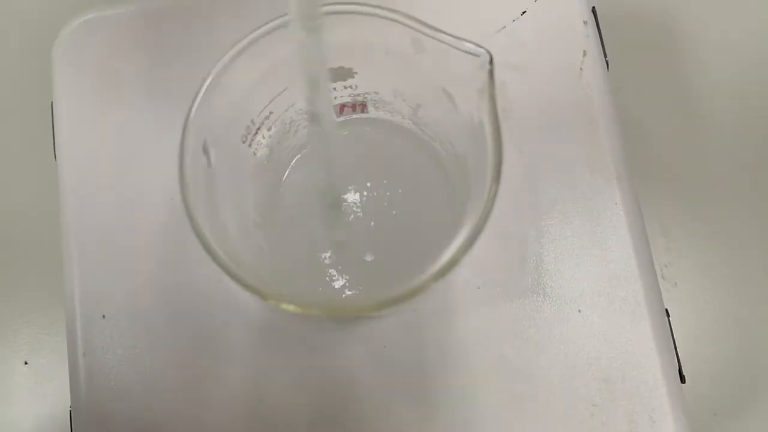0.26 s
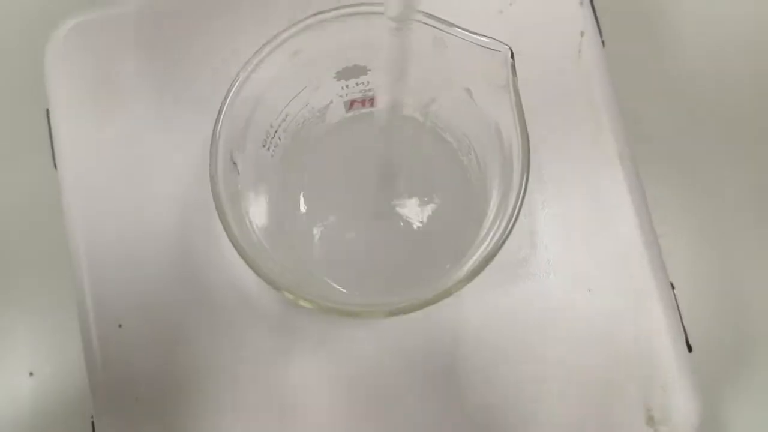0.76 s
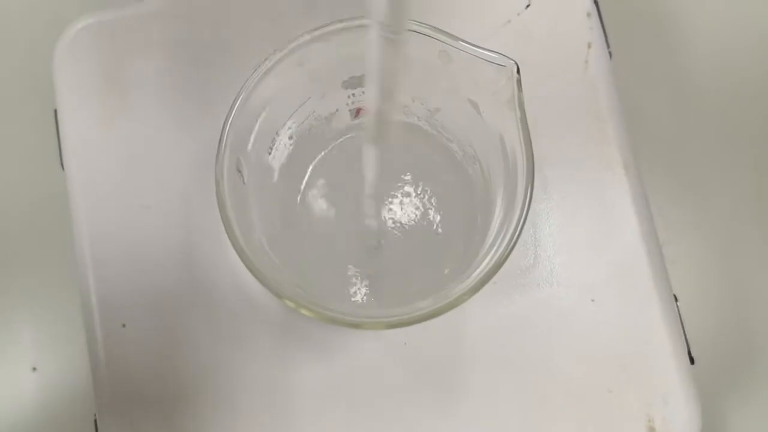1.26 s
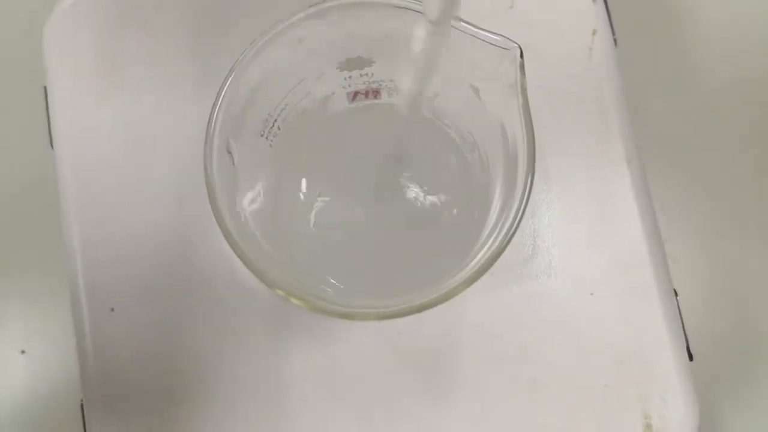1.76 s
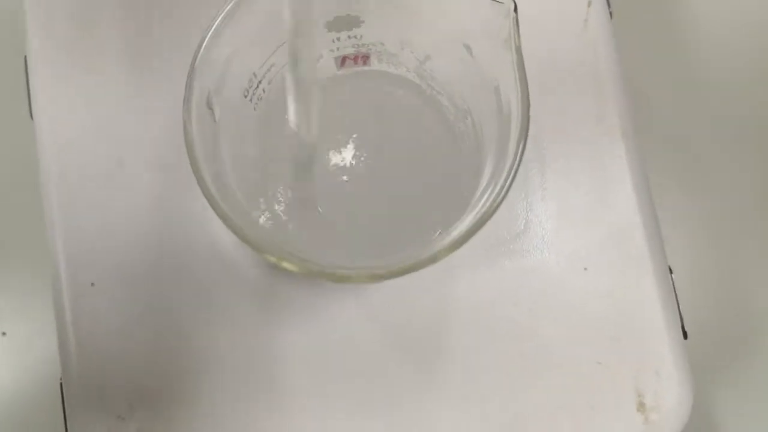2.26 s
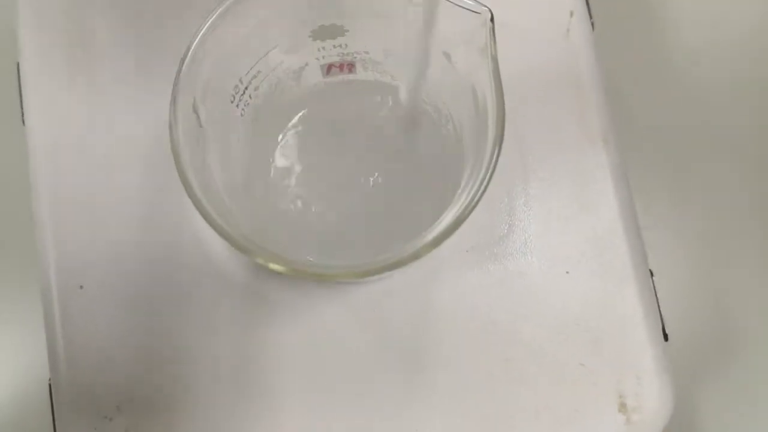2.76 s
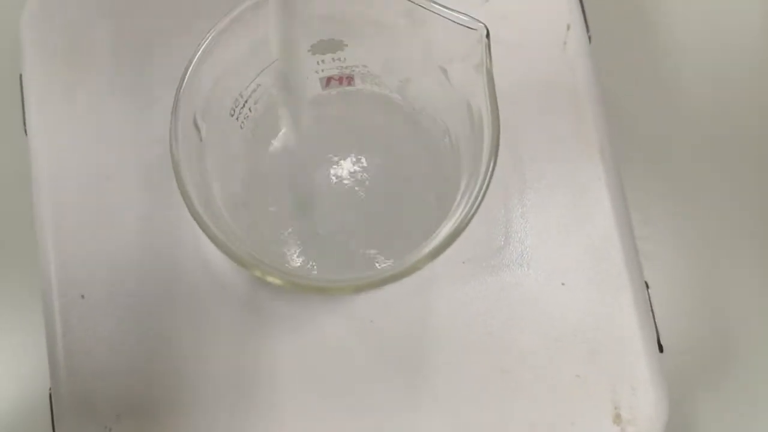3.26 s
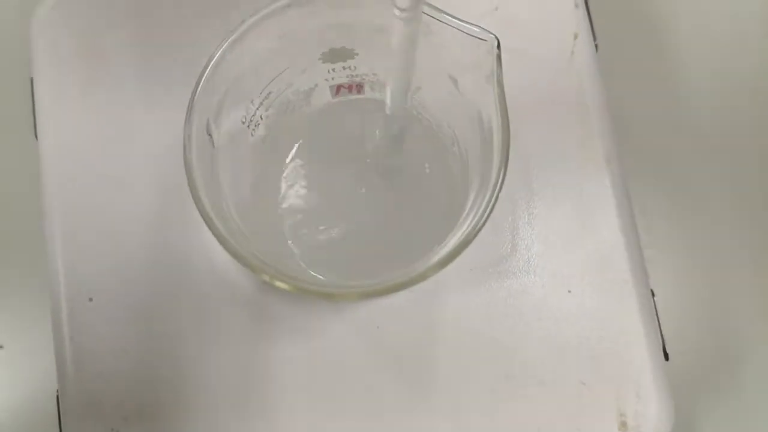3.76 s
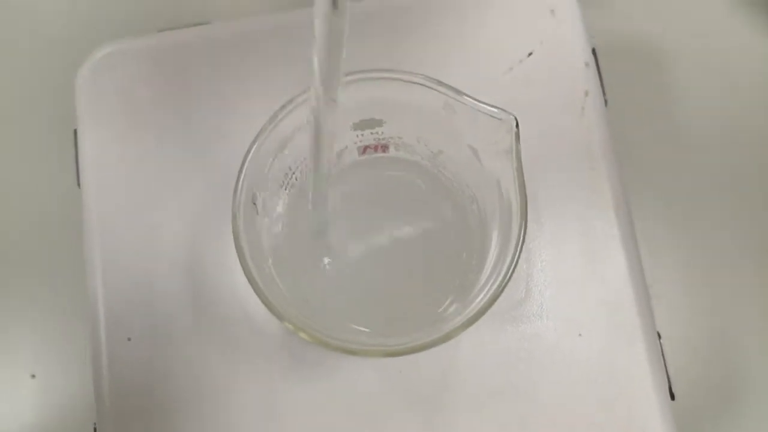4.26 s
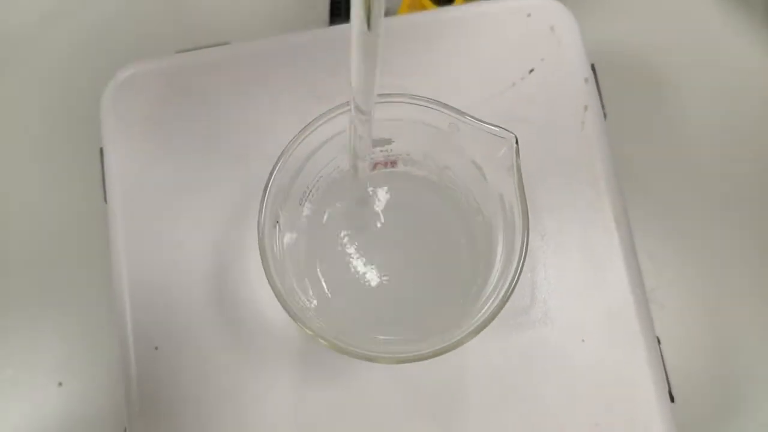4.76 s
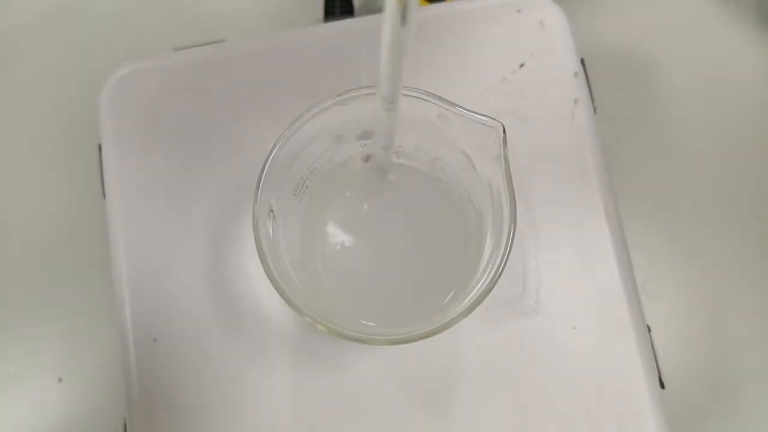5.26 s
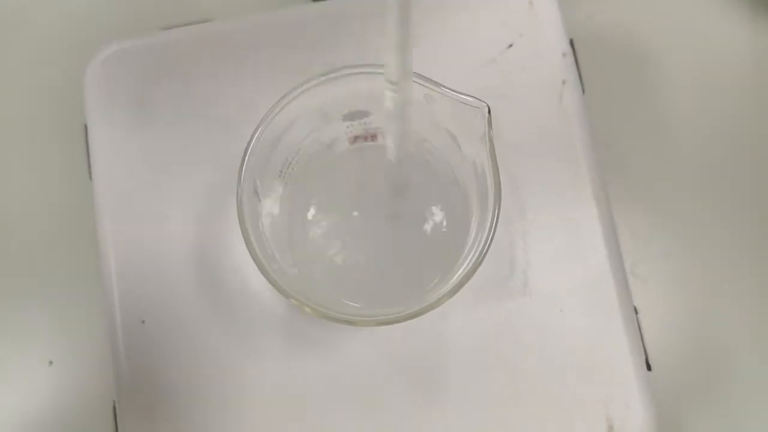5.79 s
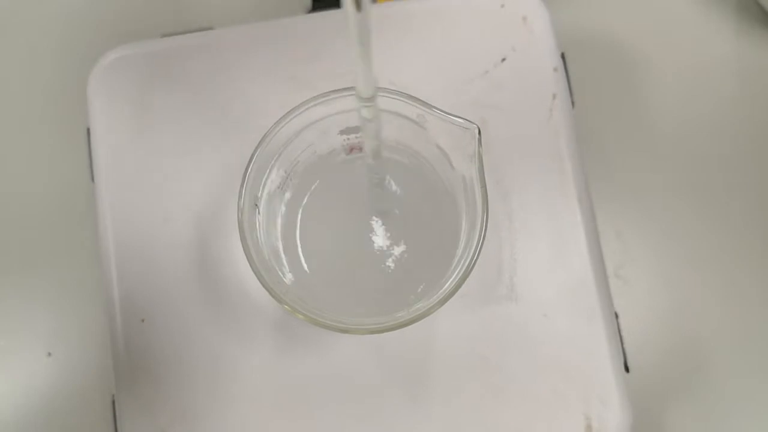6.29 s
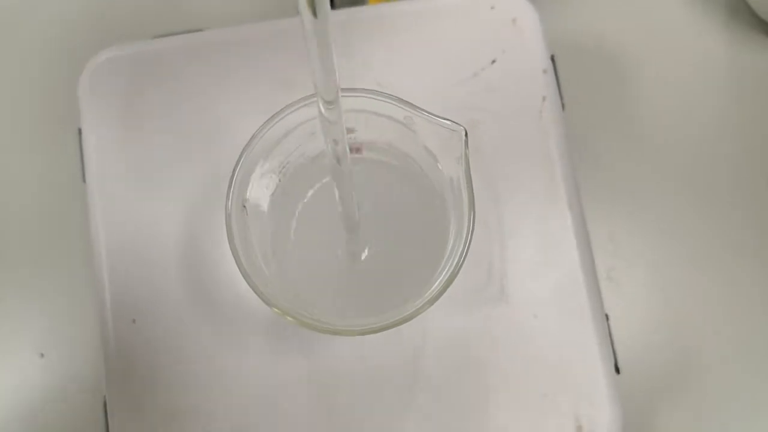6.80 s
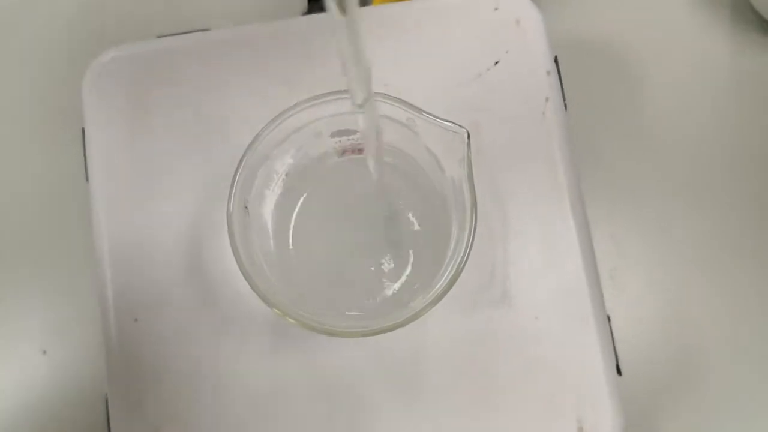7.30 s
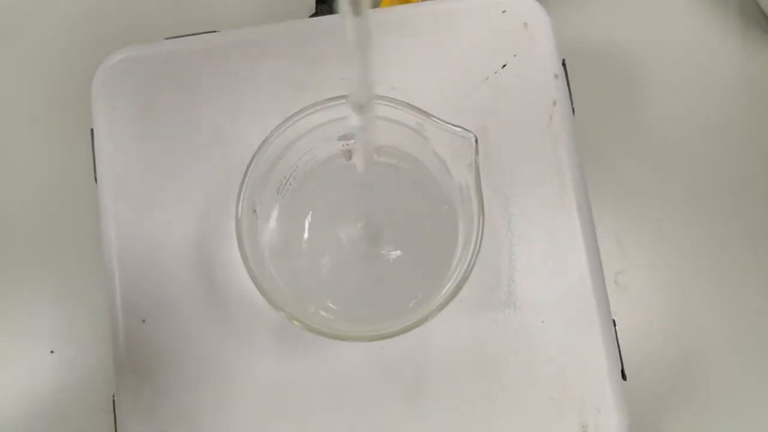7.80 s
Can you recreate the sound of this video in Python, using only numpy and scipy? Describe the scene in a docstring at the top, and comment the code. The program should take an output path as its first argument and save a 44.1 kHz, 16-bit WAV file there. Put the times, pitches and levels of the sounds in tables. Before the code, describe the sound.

Over a low hum and ventilation, a stirring rod now and then clinks and scrapes against a glass beaker.

```python
"""Stirring in a glass beaker

A glass rod stirs liquid in a beaker on a laboratory hotplate. Every few turns it clinks on the wall
and bounces; in between it grazes the glass, or sticks and slips over it with a rasp.
The liquid swishes softly and traps a few bubbles.
A machine hums steadily, and ventilation rushes and rumbles in the small, hard room."""
import sys
import numpy as np
from scipy import signal
from scipy.fft import rfft, irfft, next_fast_len
from scipy.io import wavfile
from scipy.ndimage import map_coordinates

SR = 44100
rng = np.random.default_rng(int(sys.argv[2]) if len(sys.argv) > 2 else 0)


def wav_record(signal):
    """Record a signal, one row per channel, as 16-bit PCM in the file named by sys.argv[1]."""
    frames = np.transpose(np.atleast_2d(signal))
    bounded = np.clip(frames, -1, 1)
    # unit amplitude maps onto the largest positive 16-bit level
    quanta = np.round(bounded * 32767).astype(np.int16)
    wavfile.write(sys.argv[1], SR, quanta)


N = 354563

# the tone colour of glass hitting glass: f/Hz, level/dB
CRACK_COLOUR = [(250, -19.5), (800, -11), (1300, 0.5), (5000, -2.5), (8000, 1), (11000, -18),
                (14500, -19.5), (16000, -29)]
# how the beaker's sound divides between the two sides: f/Hz, left minus right/dB
BALANCE = [(430, 0), (1200, 0), (1550, -8), (2500, -9), (2900, -1), (3300, 7), (4000, 8), (4600, -2),
           (5300, 6), (7800, 5), (8400, 0), (9700, -11), (11600, -9), (13300, -1)]


def amp(db):
    """Turn decibels into a gain."""
    return 10 ** (np.asarray(db) / 20)


def unit(x):
    """Scale a signal to an average power of 1."""
    return x / np.sqrt(np.mean(x ** 2) + 1e-20)


def along(points, hz):
    """Read a curve of (frequency, value) points on a logarithmic frequency axis."""
    f, v = np.transpose(points)
    return np.interp(np.log(hz + 1), np.log(f + 1), v)


def wobble(rate):
    """A smooth curve through `rate` random values a second."""
    return map_coordinates(rng.standard_normal(int(N * rate / SR) + 4), [np.arange(N) * rate / SR])


def filtered(x, response):
    """Multiply each frequency in x by response(hz)."""
    size = next_fast_len(x.shape[-1] + SR // 4)
    return irfft(rfft(x, size) * response(np.fft.rfftfreq(size, 1 / SR)), size)[..., :x.shape[-1]]


def add(track, s, sound):
    """Mix a stereo sound into the track, starting at s seconds."""
    part = track[:, max(round(s * SR), 0):][:, :sound.shape[1]]
    part += sound[:, :part.shape[1]]


def hum(waver_db=-0.2, drift_rad=.03, lead_rad=0.21):
    """Mains hum and motor tones waver slightly and arrive a little earlier on the left."""
    # the machine's tones: f/Hz, level/dB
    tones = [(100, -62.5), (195, -52.5), (200.05, -33.5), (224, -52), (400.1, -85.5)]
    track, t = np.zeros((2, N)), np.arange(N) / SR
    lead = np.array([[lead_rad], [-lead_rad]]) / 2
    for hz, db in tones:
        gain = np.sqrt(2) * amp(db + waver_db * wobble(2.7))
        phase = 2 * np.pi * (hz * t + rng.random()) + drift_rad * wobble(28)
        track += gain * np.sin(phase + lead)
    return track


def rumble(level_db=-41.5, apart_db=-21):
    """Long sound waves from the air ducts reach both sides almost alike."""
    # the building's rumble: f/Hz, relative level/dB
    colour = [(12, -32.5), (19, -7), (26, -8), (36, 4.5), (44, -9.5), (54, 5.5), (68, 3), (78, -21.5),
              (88, -13.5), (100, -5), (112, -10), (124, -1), (165, -1), (240, -8.5), (320, -16.5),
              (600, -35), (2000, -120)]
    waves = rng.standard_normal(N) + amp(apart_db) * rng.standard_normal((2, N))
    return amp(level_db) * unit(filtered(waves, lambda hz: amp(along(colour, hz))))


def ventilation(level_db=-52, lead_s=0.00045):
    """An even rush of air: part comes straight from the left, the rest from all around."""
    # the air's tone colour: f/Hz, left level/dB, right level/dB
    colour = [(161, -25.5, -35), (381, 0.5, -1), (530, -3, -1), (820, 0, -4.5), (870, 3.5, 2),
              (1060, 2, -9.5), (1152, -1.5, 6.5), (1360, -5, -1.5), (1800, -3, 3), (2070, -3.5, -1.5),
              (2596, -5.5, -1.5), (3400, -10.5, -12), (4630, -16, -19.5), (5840, -14.5, -17),
              (6500, -22, -28), (7550, -11, -17.5), (8750, -25.5, -33.5), (9200, -30, -21.5),
              (11400, -34.5, -33), (15500, -33, -34.5)]
    # how alike the two sides are: f/Hz, share of the power that comes straight
    share = [(300, 0.33), (900, 0.057), (2000, 0.19), (4000, 0.1)]
    lead = np.array([[lead_s], [-lead_s]]) / 2
    direct = filtered(rng.standard_normal(N),
                      lambda hz: np.sqrt(along(share, hz)) * np.exp(2j * np.pi * hz * lead))
    around = filtered(rng.standard_normal((2, N)), lambda hz: np.sqrt(1 - along(share, hz)))
    left = [(hz, db) for hz, db, _ in colour]
    right = [(hz, db) for hz, _, db in colour]
    air = filtered(direct + around, lambda hz: amp([along(left, hz), along(right, hz)]))
    return amp(level_db) * unit(air)


def ring(modes, phase_spread, lag_s, slosh, attack_s):
    """Glass rings at its own tones (modes); each fades by 60 dB in its ring time, t60."""
    t = np.arange(SR // 2) / SR
    hz, db, t60 = np.transpose(modes)[:, :, None]
    strength, skew, swirl = rng.standard_normal((3, len(hz), 1))
    sides = np.array([1, -1])[:, None, None] / 2
    envelope = amp(db + 2 * strength - 60 * t / t60) * (1 - np.exp(-(t / attack_s) ** 2))
    # liquid rising and falling along the wall bends the pitch of each tone
    pitch = hz * (1 + slosh * np.sin(2 * np.pi * (7 * t + swirl)))
    side_shift = sides * (phase_spread * skew - 2 * np.pi * hz * lag_s)
    phase = 2 * np.pi * np.cumsum(pitch, axis=1) / SR + side_shift
    return np.sum(amp(sides * along(BALANCE, hz)) * envelope * np.sin(phase), axis=1)


def crack(t60, rise_s, dull_db, balance_share=0.33):
    """Countless high, fast-fading tones of the glass merge into one short burst."""
    t = np.arange(SR // 16) / SR
    noise = rng.standard_normal(len(t)) + rng.standard_normal((2, len(t)))
    burst = noise * amp(-60 * t / t60) * (1 - np.exp(-t / rise_s))
    sides = balance_share * np.array([[1], [-1]]) / 2
    dulling = [(8000, 0), (14000, dull_db)]
    return filtered(
        burst, lambda hz: amp(along(CRACK_COLOUR, hz) + along(dulling, hz) + sides * along(BALANCE, hz)))


def contact(treble_db, low_db, mid_db, ring_factor, ring_db=6, crack_db=7, chatter_db=-12):
    """One blow rings the glass; where the rod lands decides which tones are strongest."""
    # the tones of the struck beaker and rod: f/Hz, level/dB, ring time/s
    glass_modes = [(1088, -7, 0.034), (1617, -8.5, 0.15), (1664, 2.5, 0.09), (1760, -16, 0.43),
                   (2072, -3.5, 0.05), (2356, -7.5, 0.046), (4530, -9, 0.062), (4610, -2, 0.06),
                   (4610, -19, 0.31), (4750, -13.5, 0.15), (5530, -17, 0.0035), (6000, -23, 0.022),
                   (6390, -4.5, 0.026), (7240, -2, 0.013), (7800, -3.5, .01), (7985, -1.5, 0.013),
                   (9760, -3, 0.0094), (11000, -11, 0.0087), (11300, -11.5, 0.0064), (13300, -18, .01),
                   (14500, -23, .01)]
    colour = [(2400, low_db), (3900, mid_db), (4800, mid_db), (6000, treble_db)]
    modes = [(hz, db + along(colour, hz), t60 * ring_factor) for hz, db, t60 in glass_modes]
    glass = amp(ring_db) * ring(modes, phase_spread=0.57, lag_s=0, slosh=0.011, attack_s=0.00079)
    # a light touch skids along the wall, so its crack is softer, duller and longer
    light = np.clip((-36 - treble_db) / 15, 0, 1)
    burst = crack(t60=0.019 + 0.011 * light, rise_s=0.00055 + 0.0004 * light, dull_db=-8 * light)
    add(glass, 0, amp(treble_db + crack_db) * burst)
    # hard glass bounces and touches again within a few milliseconds
    add(glass, 0.0011 * (1 + rng.random()), amp(chatter_db) * glass)
    return glass


def clinks(scatter=.08, dull_db=-15.5, low_boost_db=2.5):
    """A hard, freely ringing blow, then a duller one as the rod lands again."""
    # the rod strikes the wall: t/s, treble/dB, low tones/dB, middle tones/dB, ring time factor, bounce/s
    blows = [(0.338, -16.5, -32, -38, 0.88, .011), (3.062, -28.5, -38.5, -39, 1.24, .014),
             (4.6007, -18.5, -28.5, -31.5, 0.96, .009), (6.2608, -28, -36, -29.5, 1.11, 0.0071),
             (7.646, -20.5, -34, -27, 1.12, 0.0084)]
    track = np.zeros((2, N))
    for s, treble_db, low_db, mid_db, ring_factor, bounce_s in blows:
        add(track, s, contact(treble_db, low_db, mid_db, ring_factor))
        landing = contact(treble_db + dull_db, low_db + low_boost_db, mid_db + dull_db, ring_factor=0.52)
        add(track, s + bounce_s * np.exp(scatter * rng.standard_normal()), landing)
    return track


def touches():
    """Light ticks, cut short because the rod stays on the glass."""
    # the rod grazes the wall: t/s, treble/dB, low tones/dB
    grazes = [(0.392, -47.5, -49), (0.4487, -46.5, -47), (1.669, -44, -41), (2.0656, -47.5, -50.5),
              (2.898, -43, -70), (3.483, -42.5, -55), (3.895, -36, -45), (4.8835, -46, -53),
              (5.4362, -50.5, -60), (5.933, -49.5, -47), (6.1375, -48, -60), (6.6, -40, -37),
              (7.728, -45.5, -47)]
    track = np.zeros((2, N))
    for s, treble_db, low_db in grazes:
        add(track, s, contact(treble_db, low_db, mid_db=treble_db - 23, ring_factor=0.43))
    return track


def skitter(count=60, base_db=-55.5, spread_db=6):
    """At random moments the rod's tip brushes faintly over the wet bottom."""
    track = np.zeros((2, N))
    for when, strength, length in rng.random((count, 3)):
        brush = crack(t60=0.016 + 0.11 * length ** 2, rise_s=0.0026, dull_db=-8.5)
        add(track, when * N / SR, amp(base_db + spread_db * strength) * brush)
    return track


def bubbles(t60=0.04, attack_s=0.00092, glide_per_s=1.5):
    """A trapped bubble rings briefly, its pitch rising as it nears the surface."""
    # small bubbles in the liquid: t/s, starting f/Hz, level/dB
    blips = [(0.552, 1593, -29.5), (4.237, 1570, -40.5), (6.006, 1600, -40), (6.914, 1550, -33.5),
             (7.988, 1126, -33)]
    track, t = np.zeros((2, N)), np.arange(SR // 12) / SR
    for s, hz, db in blips:
        envelope = amp(db - 60 * t / t60) * (1 - np.exp(-t / attack_s))
        blip = envelope * np.sin(2 * np.pi * hz * t * (1 + glide_per_s * t / 2))
        add(track, s, np.array([blip, blip]))
    return track


def swishes(level_db=-54):
    """The rod pushes a soft wave of liquid round the wall."""
    # waves along the wall: t/s, length/s
    waves = [(1.307, .14), (5.38, .1), (7.206, 0.14)]
    # the tone colour of moving liquid: f/Hz, relative level/dB
    colour = [(700, -31), (1750, 5), (2600, -13.5), (4200, -21), (5800, -14), (10000, -23), (14000, -40)]
    track = np.zeros((2, N))
    for s, length_s in waves:
        size = int(length_s * SR)
        wave = filtered(rng.standard_normal((2, size)), lambda hz: amp(along(colour, hz)))
        add(track, s, amp(level_db) * unit(wave) * np.hanning(size))
    return track


def drags(slip_hz=430, jitter=.25, spread_db=2.5, grit_db=-26, hiss_db=-25, after_db=-10, build_s=0.1):
    """The rod sticks and slips: fast, uneven little blows make the beaker rasp."""
    # drags over the glass: t/s of most pressure, rise/s, fall/s, level/dB, treble bite/dB
    strokes = [(1.47, 0.015, .02, -45, -2), (1.5185, 0.0034, 0.054, -16.5, -5.5),
               (3.657, .003, .008, -43, -12), (3.791, 0.032, .018, -23.5, -3.5),
               (6.726, 0.035, 0.038, -19.5, 0), (6.7676, .002, 0.0054, -20, -0.5),
               (6.793, 0.011, 0.0069, -19, -2.5), (6.817, 0.016, 0.0098, -27.5, -4),
               (7.991, 0.015, .022, -45.5, 1)]
    # the tones of the beaker and its plate under the pressing rod: f/Hz, level/dB, ring time/s
    pressed_modes = [(432.8, -28, 0.17), (410, -30, 0.15), (984, -20, 0.067), (1197, -10, 0.058),
                     (1367, -17, 0.032), (1580, 1.5, 0.022), (1740, -0.5, 0.02), (1993, -1.5, 0.023),
                     (2334, -14, 0.015), (2524, -2, 0.011), (2800, -18, 0.012), (3370, -4, 0.013),
                     (3570, -3, 0.0076), (4730, -16, 0.0054), (5330, -9, 0.0071), (5900, -13.5, 0.012),
                     (7500, -9.5, 0.0066), (8540, -19.5, 0.0063), (10000, -28.5, 0.007),
                     (10900, -24, 0.004)]
    # the wall rings on as the rod lets go: f/Hz, level/dB, ring time/s
    released_modes = [(1730, -1, 0.8), (1710, -3, 0.83)]
    track, size = np.zeros((2, N)), SR // 4
    t = (np.arange(size) - size // 2) / SR
    hiss_tilt = [(6000, 4.5), (14000, -17)]
    for s, rise_s, fall_s, db, bite_db in strokes:
        # the pressure swells and eases: a broad top, 15 dB lower at the ends of rise and fall
        pressure = amp(-15 * np.abs(t / np.where(t < 0, rise_s, fall_s)) ** 2.9)
        gap, strength = rng.standard_normal((2, 160))
        slips = np.cumsum(np.exp(jitter * gap)) * SR / slip_hz
        force = np.bincount(slips.astype(int), amp(spread_db * strength), minlength=size)[:size]
        force += amp(grit_db) * rng.standard_normal(size)
        # each drag has its own brightness: some rasps sound duller, others sharper
        bite = [(2400, 0.023), (3300, bite_db)]
        modes = [(hz, level + along(bite, hz), t60) for hz, level, t60 in pressed_modes]
        body = ring(modes, phase_spread=1.0, lag_s=.0001, slosh=0.0063, attack_s=0.00076)
        rasp = signal.fftconvolve((force * pressure)[None], body, axes=1)
        rasp *= np.sqrt(2 * np.sum(pressure ** 2) / np.sum(rasp ** 2))  # energy follows the pressure
        # the fine roughness of the glass hisses under the rod
        noise = rng.standard_normal((2, size))
        hiss = filtered(noise, lambda hz: amp(along(CRACK_COLOUR, hz) + along(hiss_tilt, hz)))
        add(rasp, 0, amp(hiss_db + bite_db) * pressure * unit(hiss))
        add(track, s + t[0], amp(db) * rasp)
        # the longer the rod eases off, the more ring it leaves in the wall
        after = ring(released_modes, phase_spread=0.85, lag_s=0, slosh=0.011, attack_s=0.0048)
        add(track, s + fall_s / 2, amp(db + after_db) * (fall_s / build_s) ** 2 * after)
    return track


def room(x, early_db, early_s, tail_db, echoes=14):
    """The bench and nearby things echo at once; the walls add a short, smooth tail."""
    # how long the room rings: f/Hz, time to fade by 60 dB/s
    ring_times = [(300, 0.22), (1700, 0.59), (5000, 0.42), (9000, 0.28), (15000, 0.15)]
    hz, t, noise = signal.stft(rng.standard_normal((2, SR // 2)), SR, nperseg=256)
    fade = amp(-60 * t / along(ring_times, hz)[:, None])
    tail = signal.istft(noise * fade, SR, nperseg=256)[1]
    response = amp(tail_db) * tail / np.linalg.norm(tail[0])
    for side in response:
        delays = (SR * rng.uniform(.003, early_s, echoes)).astype(int)
        side[delays] += amp(early_db) * rng.standard_normal(echoes) / np.sqrt(echoes)
    return signal.fftconvolve(x, response, axes=1)[:, :N]


def scene():
    """The stirring, its echoes and the steady machines."""
    stirring = clinks() + touches() + skitter() + bubbles() + swishes()
    rasps = drags()
    echoes = room(stirring, early_db=-13.0, early_s=.022, tail_db=-15.0)
    echoes += room(rasps, early_db=-13.5, early_s=.012, tail_db=-23)
    return stirring + rasps + echoes + hum() + rumble() + ventilation()


def record(dry, top_hz=15900):
    """Cut off the very highest treble."""
    return filtered(dry, lambda hz: hz < top_hz)


dry = scene()
out = record(dry)
wav_record(out)
```